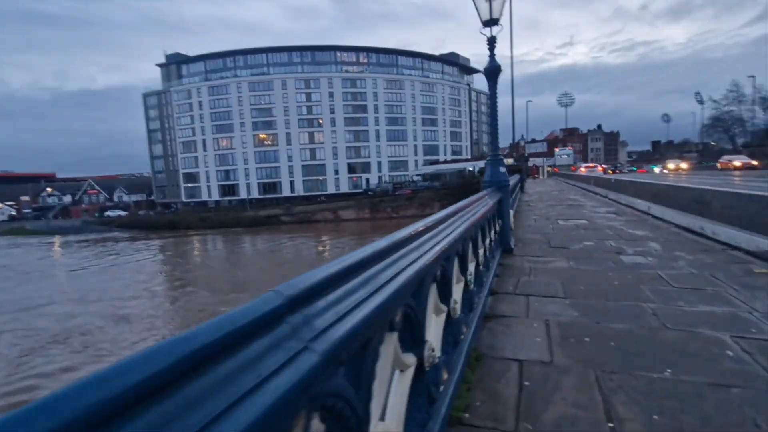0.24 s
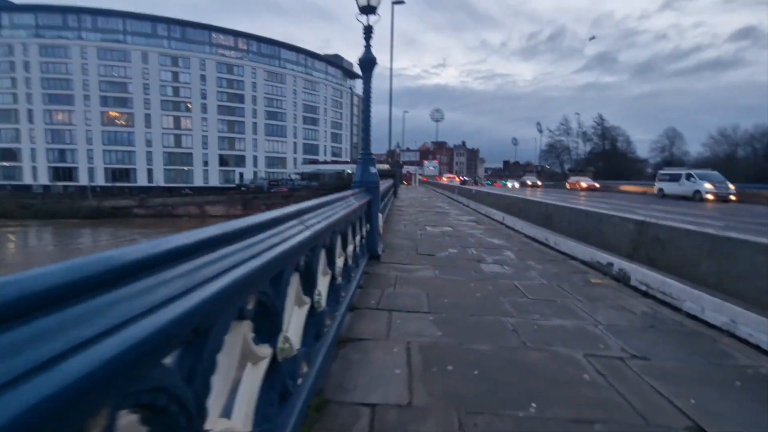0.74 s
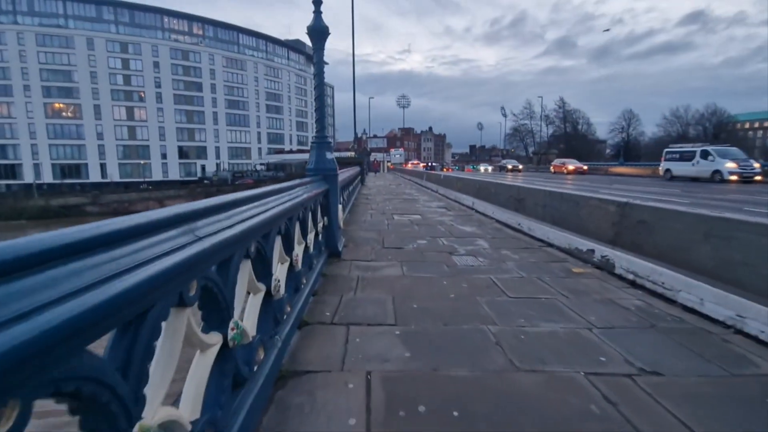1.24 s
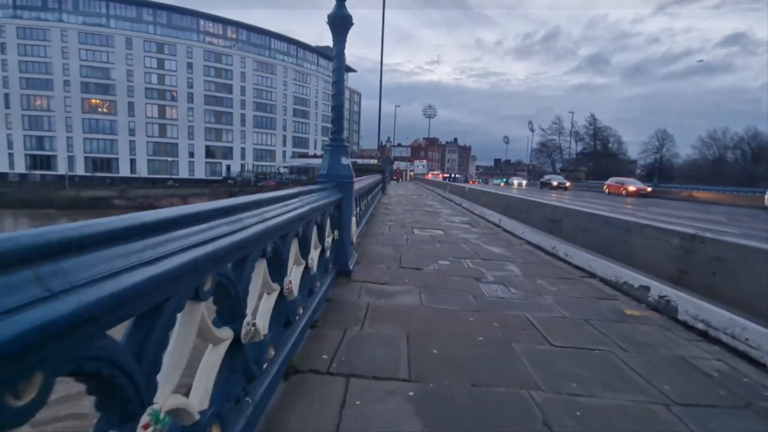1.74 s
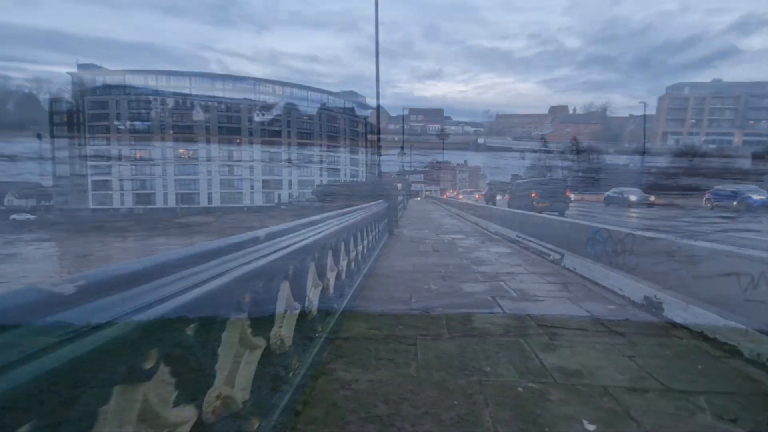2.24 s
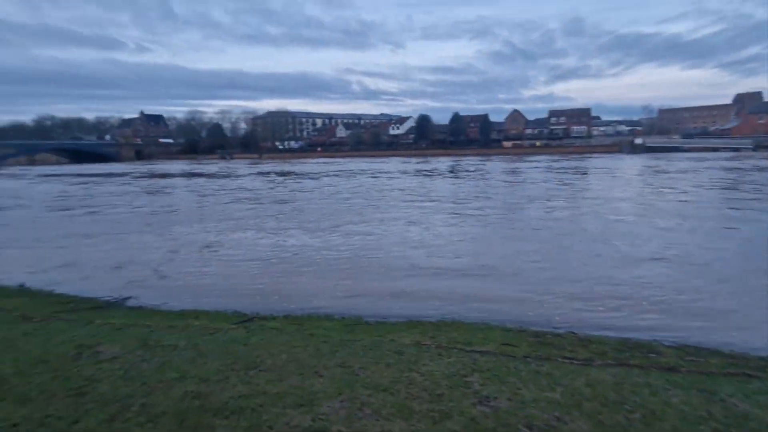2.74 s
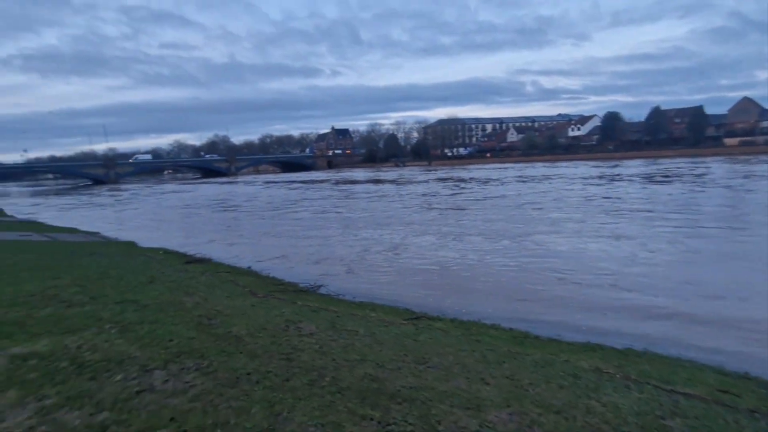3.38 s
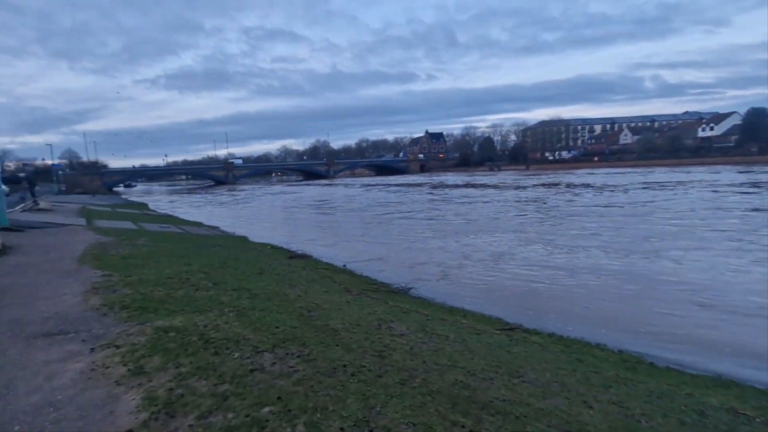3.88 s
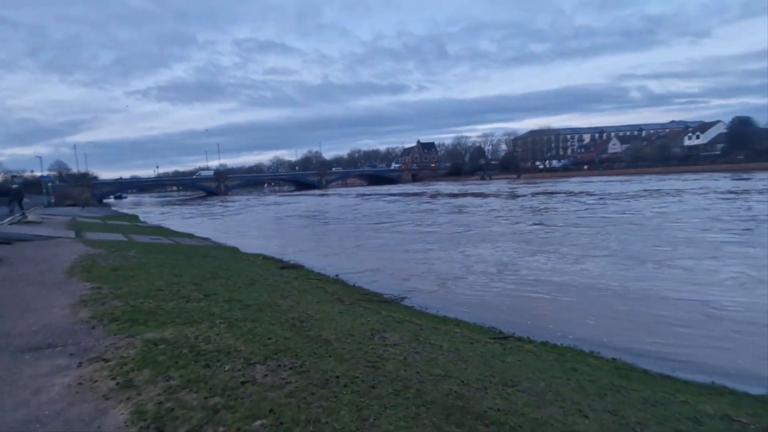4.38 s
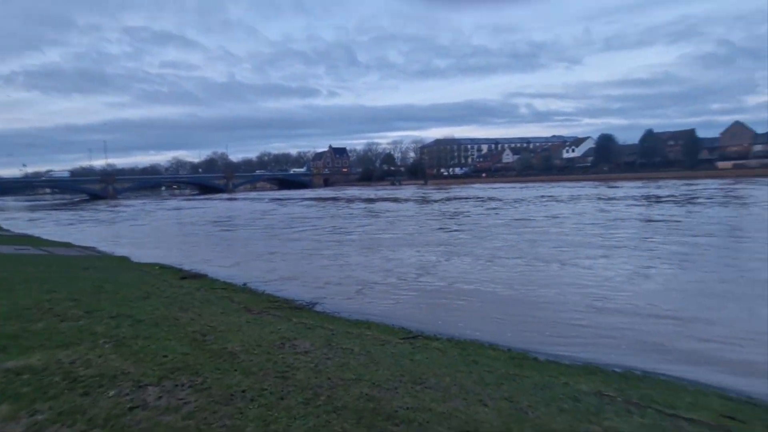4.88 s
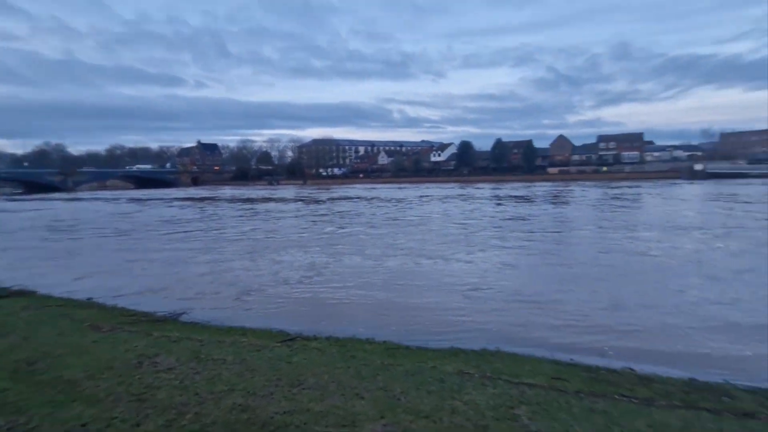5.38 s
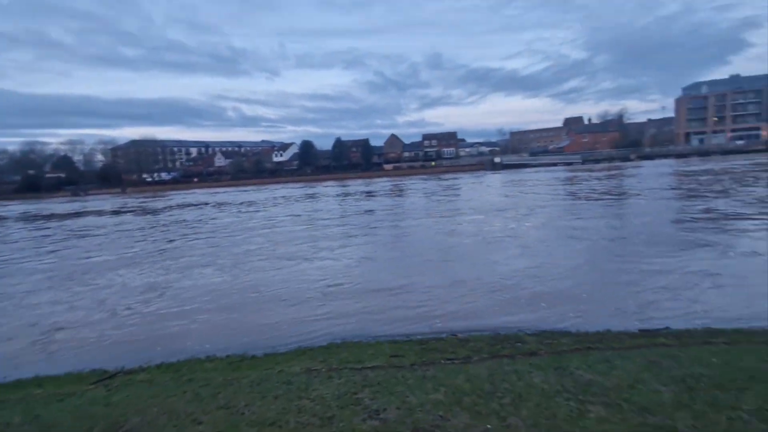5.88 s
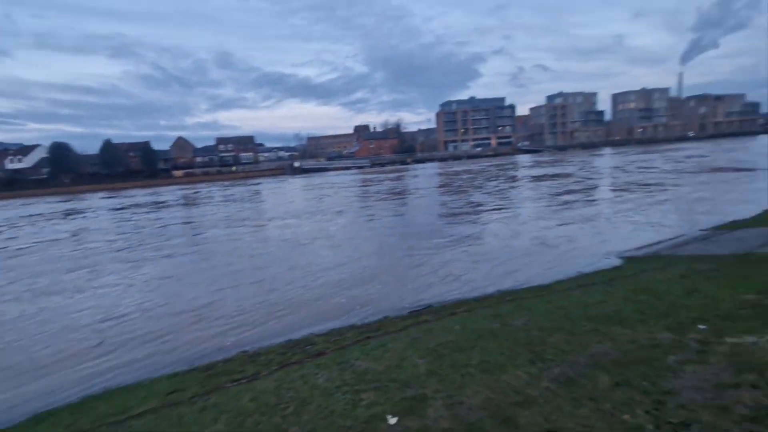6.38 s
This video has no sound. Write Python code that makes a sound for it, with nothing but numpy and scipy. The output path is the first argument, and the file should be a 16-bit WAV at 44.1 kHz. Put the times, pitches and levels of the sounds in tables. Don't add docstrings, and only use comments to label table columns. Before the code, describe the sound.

Handheld stereo phone outdoors. First, near traffic: broad tyre hiss and roar, low wheel thuds and an engine growing stronger, with sharp finger pops around one and a half seconds. After a tiny silent gap, the road is distant, bassy and muffled; thumps and rubbing on the case come early, then thin to faint scrapes and ticks.

```python
import sys
import numpy as np
from scipy import signal
from scipy.fft import rfft, irfft, next_fast_len
from scipy.io import wavfile
from scipy.ndimage import uniform_filter1d, map_coordinates

SR = 44100
rng = np.random.default_rng(int(sys.argv[2]) if len(sys.argv) > 2 else 0)


def wav_record(signal):
    frames = np.transpose(np.atleast_2d(signal))
    bounded = np.clip(frames, -1, 1)
    quanta = np.round(bounded * 32767).astype(np.int16)
    wavfile.write(sys.argv[1], SR, quanta)


def rack_gain(trim_db):
    fader = np.asarray(trim_db, float)
    return 10 ** (fader / 20)


N = 291930
FAST = next_fast_len(N)
STOP_S, START_S = 2.22526, 2.3486

# freq_hz, density_db [dB per Hz]
NEAR_TONE = [(15, -48), (30, -23.5), (45, -14), (60, -14.5), (87, -15.5), (204, -18.5), (417, -26.5),
             (650, -24), (1650, -26.5), (2100, -28), (2700, -38.5), (4000, -43.5), (7500, -55.5),
             (15800, -70)]
FAR_TONE = [(15, -47), (30, -15.5), (45, 1.5), (135, -5.5), (262, -10.5), (344, -18.5), (506, -27.5),
            (927, -27.5), (1500, -29.5), (2110, -34.5), (2860, -49.5), (4500, -63), (7500, -75),
            (15800, -73.5)]
CROSSOVERS_HZ = [400, 3000, 8500]
# freq_hz, likeness [0-1]
NEAR_ALIKE = [(60, 0.95), (350, 1), (600, 0.84), (1000, 0.1), (2000, 0.6), (3500, 0.13), (8000, .05)]
FAR_ALIKE = [(60, 1), (350, 0.93), (600, 0.6), (1000, 0.56), (2000, 0.14), (3500, 0.16), (8000, .05)]
# start_s, flow_db, bearing_db [L-R]
NEAR_ROAD = [
    (0, -1, -1),
    (.45, -1.5, -1.5),
    (1.05, 1, 0.5),
    (1.35, 0.5, 0.5),
    (1.7, -1, 4),
    (2.22, -0.06, 3),
]
FAR_ROAD = [
    (2.35, 3.5, 1),
    (3.5, 1.2, 2),
    (4.6, 0, 5),
    (5.3, 0.3, 3),
    (6, -1.5, 4),
    (6.62, -1, 1.5),
]
NEAR_DB = [-29.5, -29.5, -47.5, -66]
FAR_DB = [-35, -42.5, -62, -89.5]
NEAR_FOLLOWS = [0.32, 1.66, .3, .1]
FAR_FOLLOWS = [0.054, 0.94, 1, .1]
NEAR_LEANS = [.49, 0.1, 1.5, 11]
FAR_LEANS = [.49, 0.1, 1.5, 1.5]
# middle_s,
# rumble_lift_db
JOINTS = [(0.379, 2), (.52, 4.5), (.8, 2.5), (1.02, 9), (1.13, 1.5), (1.24, 6), (1.4, 0), (1.75, -1.5),
          (2.05, 5)]
# peak_s, peak_db, fade_db_per_s, pan_db [L-R]
PUDDLES = [
    (.07, -41.5, 64, 9),
    (1.78, -56.5, 26.5, -3),
]
WAKE_DB = [-11.5, -11, -11, -16]
# start_s, right_lead_ms
TURN = [(0, 0.28), (2.2, 0.31), (2.9, 0.34), (4, 0.25), (5, -0.19), (6.62, -0.38)]

# [above 8 kHz, re rub]
RUBS = [(0.734, 0.1, -51, 9.5), (1.129, 0.023, -35.5, -6), (1.171, 0.039, -45.5, 0),
        (1.259, 0.058, -38, -0.5), (1.342, 0.041, -36.5, -1.5), (1.418, 0.03, -39.5, 0),
        (2.402, 1, -53.5, 4), (2.485, .04, -51, -12), (2.571, 0.022, -44.5, -1), (2.678, .04, -47, 3),
        (2.761, 0.057, -49, 6), (2.874, 0.052, -46, 5), (2.97, 0.087, -49, -5.5), (3.12, 0.047, -51, 2),
        (3.151, 0.18, -53, -1), (3.345, 0.049, -49.5, -7), (3.297, 0.46, -66, 7.5), (3.562, 0.04, -59, -7),
        (3.649, 0.069, -64, -8), (4.092, 0.54, -65, -4), (4.727, 0.089, -55, -7), (4.552, 0.48, -63, -9),
        (5.075, 0.12, -56.5, -3), (5.165, 0.09, -55.5, -2), (5.265, 0.046, -63, -15),
        (5.387, 0.068, -51.5, -6), (5.504, 0.05, -52, -6.5), (5.861, 0.86, -67, 7),
        (6.104, 0.28, -58, -5.5), (6.449, 0.03, -55, 2.5)]
# start_s, length_s, buffet_db
PRESSES = [(1.167, 0.065, -37), (1.332, 0.06, -29), (1.4, 0.027, -31.5), (2.485, 0.029, -35.5),
           (2.835, 0.099, -36.5), (2.91, .46, -33), (2.97, 0.1, -25), (3.09, 0.096, -34), (3.155, 0.1, -29),
           (3.24, 0.058, -27.5), (3.347, 0.032, -25), (4.734, .064, -44), (4.86, 0.18, -48),
           (5.061, 0.15, -46), (5.393, 0.047, -40), (4.05, 0.11, -41.5), (5.7, 0.27, -50)]
# start_s, end_s, pan_db [L-R]
GRIP = [
    (0, 1, 13),
    (1, 5.8, -32),
    (5.8, 7, 28),
]
# freq_hz, density_db [dB per Hz]
RUB_TONE = [(300, -45.5), (1200, -9), (3000, 4), (4500, -0.5), (6000, -6.5), (7500, -15), (9500, -45.5)]
FIZZ_TONE = [(7000, -26.5), (8500, 2.5), (10300, -3), (11300, 0.5), (15800, 0)]
BUFFET_TONE = [(20, -26.5), (50, -5), (100, 0), (200, -6), (400, -10), (800, -13.5), (1500, -16),
               (2200, -21), (3000, -30.5), (6000, -64.5)]
# start_s, peak_db, pan_db [L-R], direction
# [+1 or -1], rise_ms
SLIPS = [(1.1146, -35, -18, 1, 0.043), (1.147, -21.5, -15.5, -1, 0.05), (1.192, -29.5, -14.5, -1, 0.043),
         (1.2527, -13.5, -12, -1, 0.064), (1.2754, -21, -17.5, -1, 0.033), (1.3477, -38.5, -20, -1, .08),
         (1.399, -24, -21, -1, 0.18), (1.4095, -6.5, -21.5, -1, 0.092), (1.4161, -8, -10, -1, 0.034),
         (1.419, -21.5, -17, -1, 0.079), (1.421, -6, -22, -1, 0.038), (1.4239, -13.5, -16, -1, 0.025),
         (1.4236, -18, -20, -1, .03), (1.4285, -17, -20, -1, .05), (2.2246, -14, 0, 1, .5),
         (2.9863, -8, -21, -1, 0.54), (3.354, -16, -19, 1, 0.25), (4.9552, -15, -15, 1, 0.13),
         (5.743, -20, 2, 1, 0.11), (5.746, -30.5, 3, -1, 0.068)]
# start_s, peak_db, pitch_hz, #
# pan_db [L-R], t60_s
TICKS = [
    (2.897, -37, 13040, -10, .03),
    (2.899, -48, 6500, -2, .03),
    (4.253, -48, 7020, -7, 0.028),
    (4.429, -50, 7240, -12, .02),
    (4.755, -54.5, 9100, 6, .02),
    (4.763, -45.5, 8530, 7, 0.067),
    (4.763, -41, 2400, 4, .04),
    (5.228, -53, 7030, 11, .03),
    (2.9415, -23, 1050, 15, .011),
    (5.742, -34, 92, 0, .12),
]

# freq_hz, gain_db
MIC = [(7600, -0.5), (8300, -8), (9500, -10), (10800, -4.5), (11600, -0.5), (13000, 1)]
# freq_hz, gain_db
LEFT_DIP = [(7400, 0), (8100, -4), (9300, -8), (10600, -1), (11300, 0.5)]
# freq_hz, gain_db
RIGHT_PORT = [(7400, 0), (8600, 2), (10000, 2.5), (11500, -2.5), (15800, -2.5)]
# freq_hz, threshold_db
MUTING = [(7000, -35), (7900, -6.5), (10800, -1.5), (11500, -5.5), (16000, -5)]


def bridge_road():
    t = np.arange(N) / SR
    levels_db, pans_db = flow(NEAR_ROAD, NEAR_DB, NEAR_FOLLOWS, NEAR_LEANS)
    rumble, roar, hiss, spray = levels_db
    *pans, spray_pan = pans_db
    thud_s = 0.049
    for s, lift_db in JOINTS:
        rumble = rumble + lift_db * np.exp(-((t - s) / thud_s) ** 2)
    bursts = np.array([rack_gain(2 * (db - fade * abs(t - s))) for s, db, fade, _ in PUDDLES])
    steady_spray = rack_gain(2 * spray)
    wet = bursts.sum(axis=0) + steady_spray
    burst_pans = np.transpose(PUDDLES)[-1]
    spray_pan = (burst_pans @ bursts + spray_pan * steady_spray) / wet
    wet_hiss_db = 1.5
    hiss = 10 * np.log10(rack_gain(2 * hiss) + rack_gain(2 * wet_hiss_db) * wet)
    layers_db = [rumble, roar, hiss, 10 * np.log10(wet)]
    return traffic(layers_db, [*pans, spray_pan], NEAR_TONE, NEAR_ALIKE, patchy_db=1, swell_db=.25)


def traffic(levels_db, pans_db, spectrum, likeness, patchy_db, swell_db):
    hz = np.fft.rfftfreq(FAST, 1 / SR)
    alike = np.clip(along(likeness, hz), 0, 1)
    left, other = rfft(patches(patchy_db), FAST) * rack_gain(along(spectrum, hz))
    pair = np.array([left, alike * left + np.sqrt(1 - alike ** 2) * other])
    above = [1] + [1 / (1 + (edge / (hz + 1)) ** 6) for edge in CROSSOVERS_HZ] + [0]
    swell = swell_db * wobble(6)
    out = np.zeros((2, N))
    for k in range(4):
        layer = unit(irfft(pair * (above[k] - above[k + 1]), FAST)[:, :N])
        surge = swell * (5 if k == 0 else 1)
        out += rack_gain(levels_db[k] + surge) * sides(pans_db[k]) * layer
    return out


def flow(road, steady_db, follows, leans_db):
    flow_db, bearing_db = curves(road)
    levels_db = np.outer(follows, flow_db) + np.c_[steady_db]
    pans_db = np.outer([0, 1, 1, 0], bearing_db) + np.c_[leans_db]
    return levels_db, pans_db


def aimed(pair):
    lead = curves(TURN)[0] * SR / 1000
    right = map_coordinates(pair[1], [np.arange(N) + lead], mode="mirror")
    return np.array([pair[0], right])


def engine():
    t = np.arange(N) / SR
    ahead = np.clip(STOP_S - t, 0, None)
    firing_hz, sag_hz_per_s = 55.1, 3.2
    turn = 2 * np.pi * np.cumsum(firing_hz + sag_hz_per_s * ahead) / SR + .5 * wobble(5.3)
    turn = turn - turn[round(STOP_S * SR)] + np.pi / 2
    tone = np.sin(turn) + rack_gain(-16.5) * np.sin(2 * turn)
    tone += rack_gain(-19) * np.sin(2.1 * turn) + rack_gain(-21) * np.sin(4 * turn)
    beat_hz, cancel_s, second_db = 6.62, 1.95, -9
    tone -= rack_gain(second_db) * np.sin(turn - 2 * np.pi * beat_hz * (t - cancel_s))
    loudest_db, nearing_db_per_s = -20, 6
    hidden_s, hidden_db = 0.47, -3
    screen_db = hidden_db * np.clip(10 * (hidden_s - t), 0, 1)
    level_db = loudest_db - nearing_db_per_s * ahead + screen_db + 1.7 * wobble(8.84)
    return np.sqrt(2) * rack_gain(level_db) * tone * sides(0.91)[:, None]


def rubs():
    def noise(grain_db, rate):
        return rng.standard_normal(N) * rack_gain(grain_db * wobble(rate))

    def buffet_gain(hz):
        return rack_gain(along(BUFFET_TONE, hz))

    hiss = touches([row[:-1] for row in RUBS])
    fizz = touches([(s, length, db + fizz_db) for s, length, db, fizz_db in RUBS])
    thump = touches(PRESSES)
    skin = noise(1.9, 300)
    drag = rack_gain(2.5) * np.sqrt(hiss) * coloured(skin, lambda hz: rack_gain(along(RUB_TONE, hz)))
    spit = rack_gain(-15) * np.sqrt(fizz) * coloured(skin, lambda hz: rack_gain(along(FIZZ_TONE, hz)))
    press = noise(1.5, 80)
    lumps = rack_gain(5) * np.sqrt(thump) * coloured(press, buffet_gain)
    case_bass = coloured(press, lambda hz: buffet_gain(hz) / (1 + (hz / 220) ** 4))
    through_case = rack_gain(-5) * np.sqrt(thump.sum(axis=0)) * case_bass
    return drag + spit + lumps + through_case


def touches(rows):
    power = np.zeros((2, N + SR))
    for s, length, db in rows:
        t = np.arange(round((length + .04) * SR)) / SR
        ease_on = np.clip(t / (0.0087 + 0.21 * length), 0, 1)
        ease_off = np.clip((length + 0.017 - t) / (0.045 + 0.093 * length), 0, 1)
        touch = ease_on * ease_off
        pan_db = sum(lean_db for start, end, lean_db in GRIP if start <= s < end)
        power[:, round(s * SR):][:, :len(t)] += rack_gain(2 * db) * touch ** 2 * sides(pan_db)[:, None] ** 2 / 2
    return power[:, :N]


def slips():
    out, t = np.zeros((2, N + SR)), np.arange(SR // 6) / SR
    for s, db, pan_db, direction, rise_ms in SLIPS:
        rise = 1 - np.exp(-(1000 * t / rise_ms) ** 2)
        push = rise * (np.exp(-t / 0.00038) - 0.068 * np.exp(-t / .002))
        out[:, round(s * SR):][:, :len(t)] += rack_gain(db) * np.sign(direction) * push * sides(pan_db)[:, None]
    return out[:, :N]


def ticks():
    out, t = np.zeros((2, N + SR)), np.arange(SR // 6) / SR
    for s, db, pitch_hz, pan_db, t60 in TICKS:
        jitter = rng.standard_normal(len(t)) + 1000 / pitch_hz
        shake = signal.lfilter(*signal.butter(2, .2 * pitch_hz, fs=SR), jitter)
        decay = rack_gain(-60 * t / t60) * (1 - np.exp(-t / 0.0008))
        ring = shake * np.sin(2 * np.pi * pitch_hz * t) * decay
        ring = rack_gain(db) * ring / abs(ring).max()
        out[:, round(s * SR):][:, :len(t)] += ring * sides(pan_db)[:, None] / np.sqrt(2)
    return out[:, :N]


def bank_road():
    levels_db, pans_db = flow(FAR_ROAD, FAR_DB, FAR_FOLLOWS, FAR_LEANS)
    wake_s = 0.032
    wake = np.exp(-abs(np.arange(N) / SR - START_S) / wake_s)
    levels_db = levels_db + np.outer(WAKE_DB, wake)
    return traffic(levels_db, pans_db, FAR_TONE, FAR_ALIKE, patchy_db=1, swell_db=.12)


def unit(x):
    return x / np.sqrt(np.mean(x ** 2, axis=-1, keepdims=True) + 1e-20)


def along(points, hz):
    f, v = np.transpose(points)
    return np.interp(np.log(hz + 1), np.log(f + 1), v)


def curves(rows):
    s, *cols = np.transpose(rows)
    return np.array([np.interp(np.arange(N) / SR, s, c) for c in cols])


def wobble(rate):
    knots = rng.standard_normal(int(N * rate / SR) + 4)
    return map_coordinates(knots, [np.arange(N) * rate / SR])


def sides(pan_db):
    return np.sqrt(2 / (1 + rack_gain(np.array([-2 * pan_db, 2 * pan_db], float))))


def patches(depth_db):
    z = signal.stft(rng.standard_normal((2, N + 512)), nperseg=512)[2]
    field = uniform_filter1d(rng.standard_normal(z.shape[1:]), size=5, axis=0)
    field = uniform_filter1d(field, size=7, axis=1)
    return signal.istft(z * rack_gain(depth_db * field / field.std()), nperseg=512)[1][:, :N]


def coloured(x, gain):
    hz = np.fft.rfftfreq(FAST, 1 / SR)
    return unit(irfft(rfft(x, FAST) * gain(hz), FAST)[..., :N])


def scene():
    bridge = aimed(bridge_road()) + engine()
    bank = aimed(bank_road())
    place = np.where(np.arange(N) / SR < START_S, bridge, bank)
    return place + rubs() + slips() + ticks()


def mute_faint(x, below_db):
    hz, _, z = signal.stft(x, SR, nperseg=1024)
    power = uniform_filter1d(abs(z) ** 2, size=2, axis=2)
    loud = uniform_filter1d(power[:, 8:].sum(axis=1, keepdims=True), size=61, axis=2)
    bands = power[:, :512].reshape(2, 128, 4, -1).mean(axis=2)
    whim = uniform_filter1d(rng.standard_normal(bands.shape[1:]), size=3, axis=1)
    ragged_db = 4.5
    bands = (bands * rack_gain(2 * ragged_db * whim / whim.std())).repeat(4, axis=1)
    bar = loud ** 1.5 * rack_gain(2 * (below_db + along(MUTING, hz[:-1])))[:, None]
    faint = np.pad(bands < bar, ((0, 0), (0, 1), (0, 0)))
    return signal.istft(np.where(faint, rack_gain(-20) * z, z), SR, nperseg=1024)[1][:, :N]


def band_limit(x):
    return signal.sosfilt(signal.butter(12, 15900, fs=SR, output="sos"), x)


def record(dry):
    t = np.arange(N) / SR
    hz = np.fft.rfftfreq(FAST, 1 / SR)
    ports_db = along(MIC, hz) + [along(LEFT_DIP, hz), along(RIGHT_PORT, hz)]
    heard = irfft(rfft(dry, FAST) * rack_gain(ports_db), FAST)[:, :N]
    gate = (t < STOP_S) + np.clip((t - START_S) / 0.0026, 0, 1)
    mix = mute_faint(heard, below_db=-47) * gate
    return band_limit(mix)


dry = scene()
out = record(dry)
wav_record(out)
```